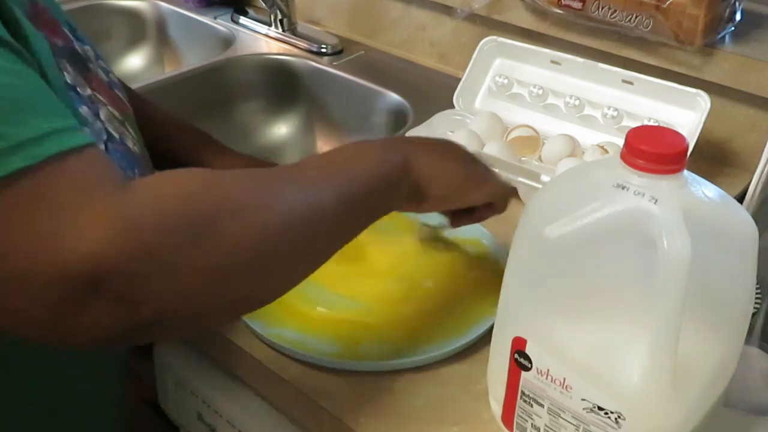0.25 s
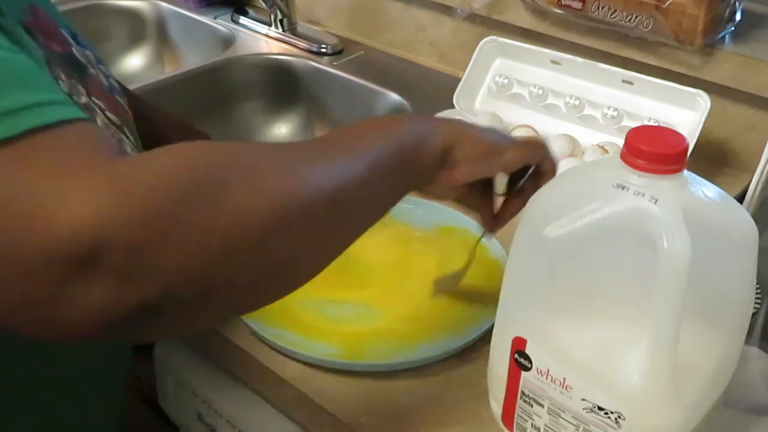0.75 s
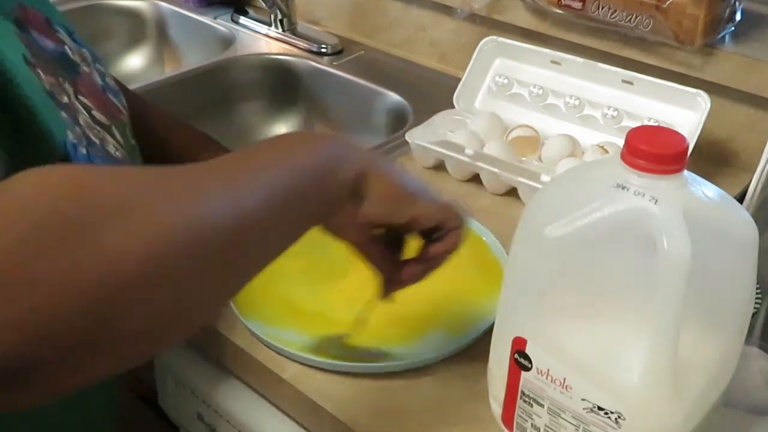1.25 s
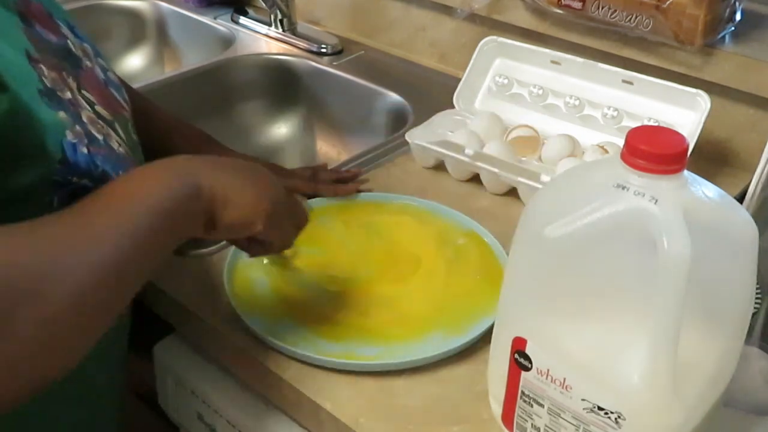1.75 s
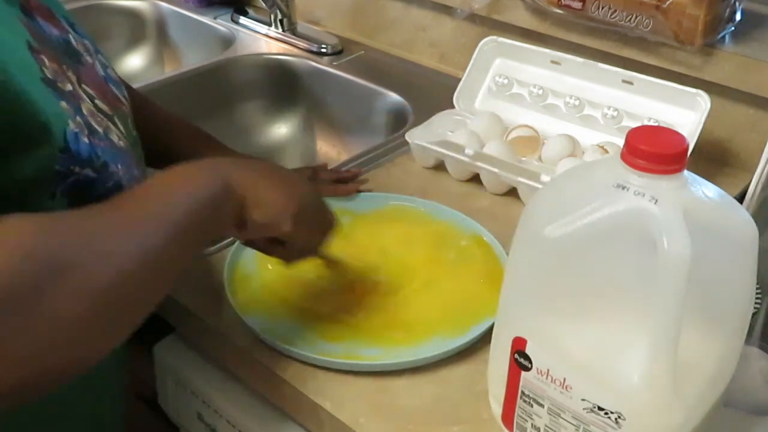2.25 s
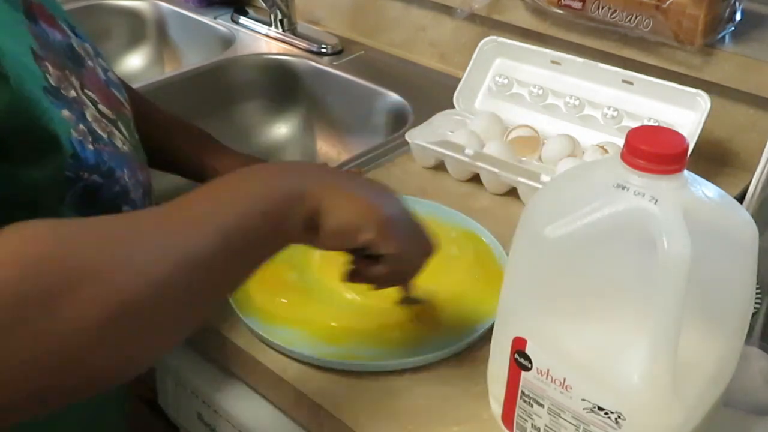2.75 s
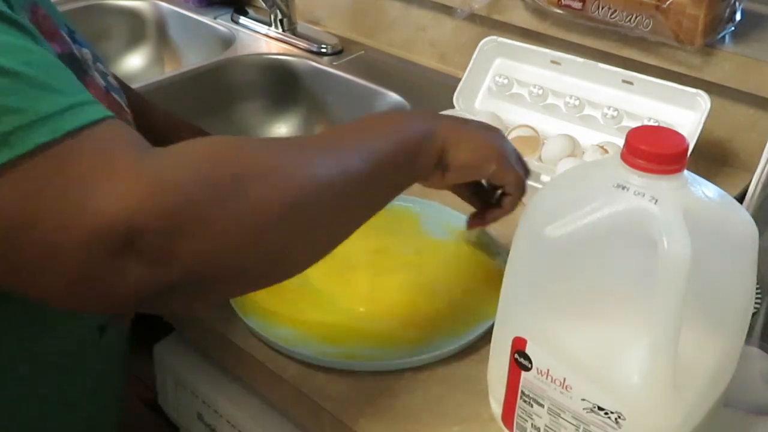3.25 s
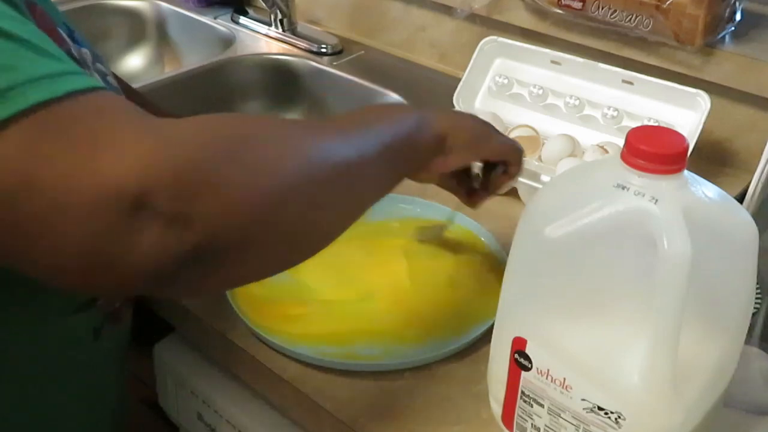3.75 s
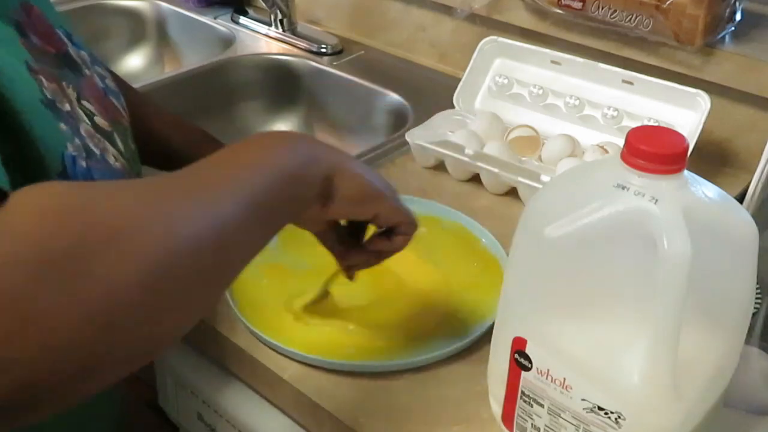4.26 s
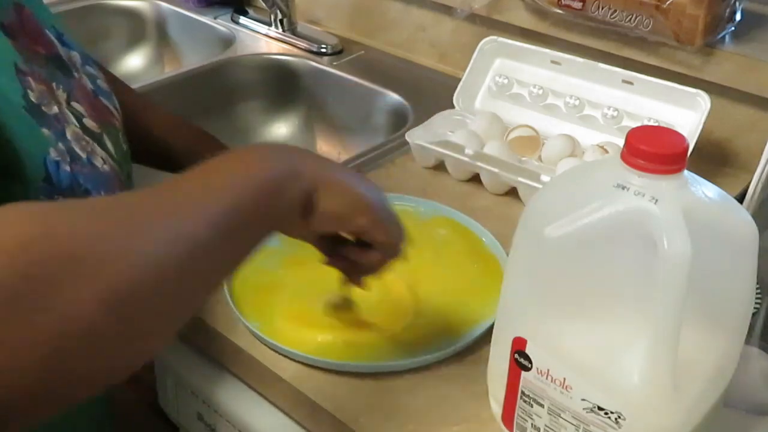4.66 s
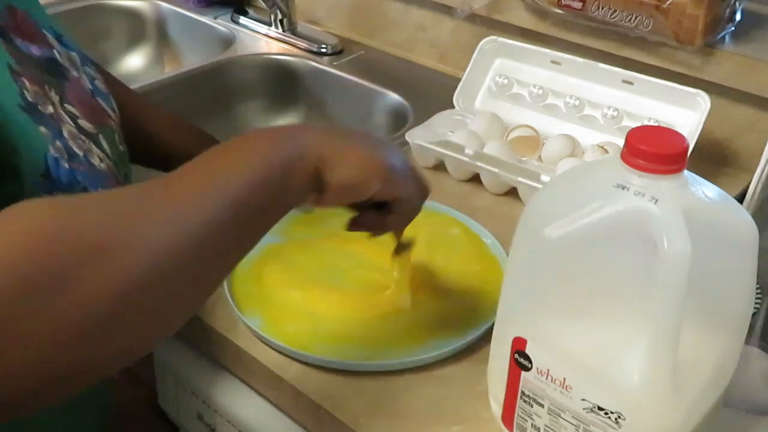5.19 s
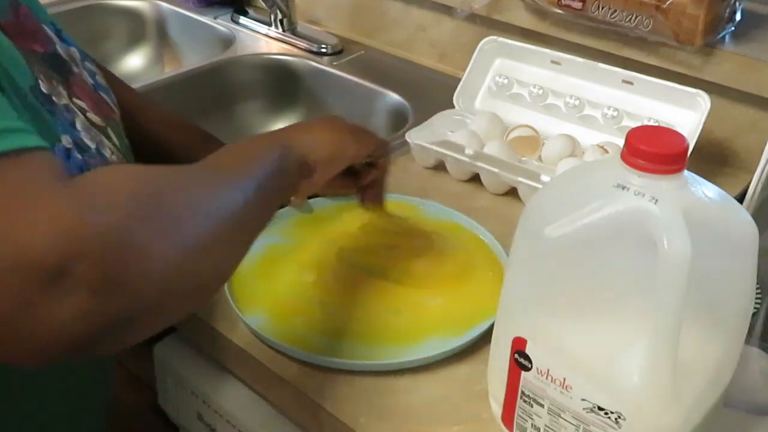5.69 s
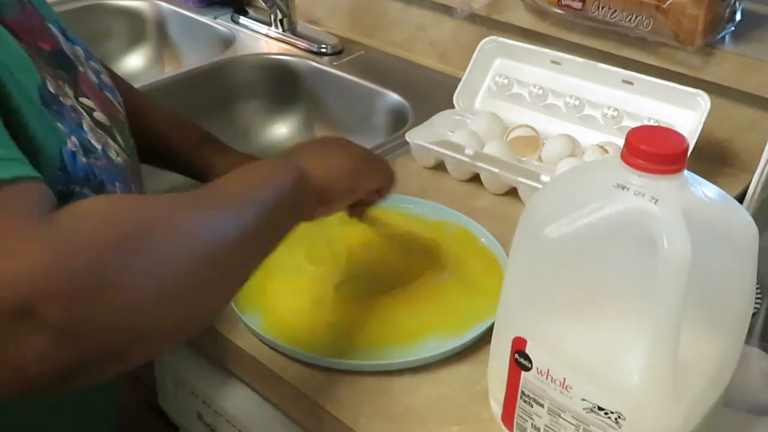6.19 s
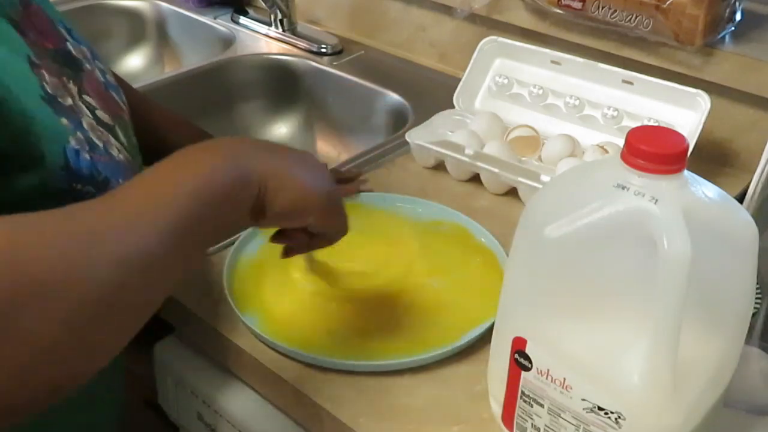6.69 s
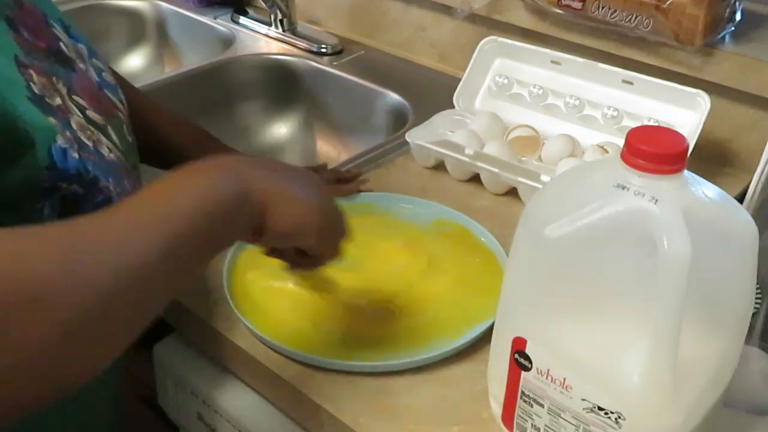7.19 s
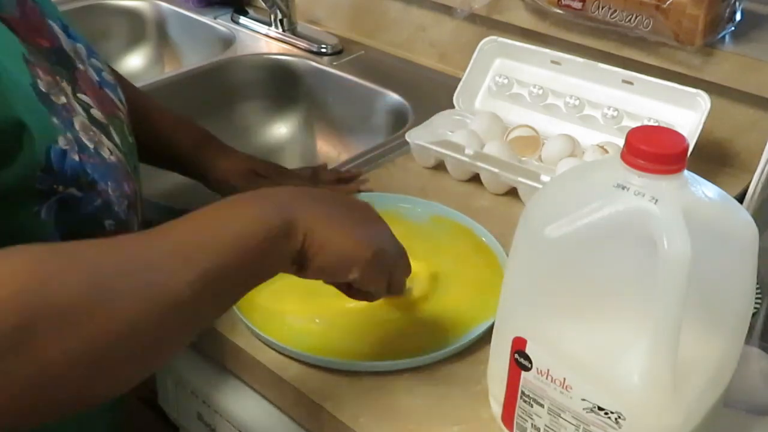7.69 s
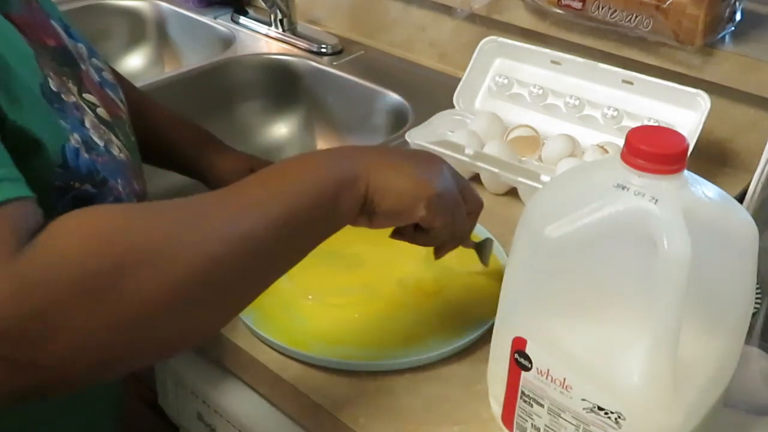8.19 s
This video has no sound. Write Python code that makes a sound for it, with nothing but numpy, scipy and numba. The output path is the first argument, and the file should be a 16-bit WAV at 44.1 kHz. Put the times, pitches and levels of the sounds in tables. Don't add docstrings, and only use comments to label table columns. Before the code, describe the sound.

Fast fork scrapes and sharp ceramic clacks as eggs are whisked on a plate in a small kitchen, with low room rumble underneath.

```python
import sys
import numpy as np
from scipy import signal
from scipy.fft import rfft, irfft, next_fast_len
from scipy.io import wavfile
from scipy.ndimage import uniform_filter1d
from numba import njit

SR = 44100
rng = np.random.default_rng(int(sys.argv[2]) if len(sys.argv) > 2 else 0)


def rack_gain(trim_db):
    fader = np.asarray(trim_db, float)
    return 10 ** (fader / 20)


def dump_mix(stems):
    frames = np.atleast_2d(stems).T
    limited = np.clip(frames, -1, 1)
    pcm = np.round(limited * 32767).astype(np.int16)
    wavfile.write(sys.argv[1], SR, pcm)


N = 372204


def noise():
    return rng.standard_normal(N)


def unit(x):
    return x / np.sqrt(np.mean(x ** 2))


def colour(x, points):
    hz, db = np.transpose(points)
    size = next_fast_len(len(x))
    bins_hz = np.arange(size // 2 + 1) * SR / size
    gain = rack_gain(np.interp(np.log(bins_hz + 1), np.log(hz), db))
    return irfft(rfft(x, size) * gain, size)[:len(x)]


def ring(x, hz, t60_s):
    r = np.exp(-np.log(1000) / (t60_s * SR))
    w = 2 * np.pi * hz / SR
    return signal.lfilter([1, 0, -1], [1, -2 * r * np.cos(w), r * r], x)


@njit
def sweep(x, hz, width_hz):
    y, band, low = np.empty(len(x)), 0., 0.
    for i in range(len(x)):
        g, k = np.tan(np.pi * hz[i] / SR), width_hz / hz[i]
        v = (band + g * (x[i] - low)) / (1 + g * (g + k))
        band, low, y[i] = 2 * v - band, low + 2 * g * v, k * v
    return y


def walk(rate_hz):
    hold = int(SR / rate_hz)
    steps = np.repeat(rng.standard_normal(N // hold + 1), hold)
    return 0.8 * uniform_filter1d(steps, hold)[:N]


# (frequency [Hz], width [Hz], level above body [dB])
SKID_RINGS = [(1177, 35, 8), (1400, 36, -22), (1490, 61, 7), (1720, 41, -9), (1893, 130, 9.5),
              (2268, 67, 10), (2326, 51, 1), (2441, 67, 9.5), (2668, 68, 6.5), (2690, 65, -20),
              (2800, 60, -1), (3230, 165, 9.5), (3500, 230, 5), (3730, 65, -15), (4286, 48, 12),
              (5430, 126, 11), (5900, 84, -16), (6040, 42, 4.5), (6610, 78, 9), (6590, 120, 7.5),
              (7640, 250, 7), (9290, 180, 10)]
# (frequency [Hz], density [dB per Hz])
SKID_BODY = [(700, -32), (1100, -13.5), (1700, -0.5), (2100, -10), (2300, -2.5), (2700, -5.5), (3050, -17),
             (3450, -7), (4150, -20), (5300, -9.5), (6600, -10), (8600, -20), (14500, -24.5), (16200, -25)]
# (frequency [Hz], density [dB per Hz])
FLAT_BODY = [(700, -12), (1000, -13), (1350, -3), (1800, -12), (2400, -13), (2700, -8.5), (3200, -5),
             (3700, -3), (4300, -7), (4800, -10), (5200, -3.5), (6600, -9.5), (8600, -15.5), (14500, -11),
             (16200, -38)]


def skid(slips_per_s=6000, scatter_db=2.0, spot_db=8.0, spot_hz=26, bend=0.022, rough_db=1.96,
         patchy_db=1.85, lean_share=0.043):
    sizes = rack_gain(scatter_db * rng.exponential(size=N)) * np.sign(noise())
    grit = unit((rng.random(N) < slips_per_s / SR) * sizes)
    plate = spots(grit)
    feed = rack_gain(spot_db * (np.minimum(walk(spot_hz), 0.9) - 1))
    pitch = 1 + bend * walk(9)
    for hz, width_hz, db in SKID_RINGS:
        slip, spot, load = (np.roll(x, rng.integers(N)) for x in (grit, feed, pitch))
        plate = plate + rack_gain(db) * sweep(slip * spot, hz * load, float(width_hz))
    plate = plate * rack_gain(rough_db * walk(60))
    lean = np.clip(.5 + .6 * walk(8), 0, 1)
    low, high = (colour(plate, np.array(SKID_BODY) * [1 + way * lean_share, 1]) for way in (-1, 1))
    upright = lean * high + (1 - lean) * low
    flat = laid_flat()
    zones = split(travel((1 - flat) * upright + flat * colour(plate, FLAT_BODY)))
    gains = stroke_gains() * rack_gain(patchy_db * np.array([walk(30) for _ in zones]))
    near = np.sum(gains * zones, axis=0)
    far = np.sum(gains * np.roll(zones, 3000, axis=1), axis=0)
    return near, far


def spots(grit, ripple_db=8.0, step_hz=170, rate_hz=18, swap_db=7.5, smooth_hz=14000, count=5):
    hz = np.arange(step_hz, SR / 2, step_hz)
    depth_db = ripple_db / (1 + (hz / smooth_hz) ** 2)
    combs = [np.transpose([hz, depth_db * rng.standard_normal(len(hz))]) for _ in range(count)]
    shares = rack_gain(swap_db * np.array([walk(rate_hz) for _ in combs]))
    shares /= np.sqrt(np.sum(shares ** 2, axis=0))
    plate = 0
    for share, comb in zip(shares, combs):
        plate = plate + share * unit(colour(np.roll(grit, rng.integers(N)), comb))
    return plate


# (time [s], share laid flat [0-1])
FLAT = [(0, 0.06), (1.2, 0.27), (1.5, 0), (3.1, 0), (3.3, 0.04), (3.8, 0.2), (4, 0.07), (5.3, 0.03),
        (5.55, 0.8), (6.2, 0.33), (6.35, 0.63), (6.8, 0.97), (7.1, 0.2), (7.5, 0.06), (7.9, 0.15),
        (8.44, 0.95)]


def laid_flat():
    return np.clip(np.interp(np.arange(N) / SR, *np.transpose(FLAT)), 0, 1)


# (upright [Hz], flat [Hz])
RIM_RING_HZ, CENTRE_RING_HZ, TRAVEL_FROM_S = (1830, 1390), (2480, 3180), 5.6


def travel(plate, rim_db=-3.0, centre_db=-14.0, rim_width_hz=710.0, centre_width_hz=290.0):
    flat = laid_flat()
    rim = rack_gain(rim_db) * sweep(plate, np.interp(flat, (0, 1), RIM_RING_HZ), rim_width_hz)
    centre = rack_gain(centre_db) * sweep(plate, np.interp(flat, (0, 1), CENTRE_RING_HZ), centre_width_hz)
    return plate + (np.arange(N) / SR > TRAVEL_FROM_S) * (rim + centre)


ZONE_HZ = (2100, 4300, 8300, 11500)


def split(x, order=8):
    size = next_fast_len(N)
    hz, spectrum = np.arange(size // 2 + 1) * SR / size, rfft(x, size)
    below = [irfft(spectrum / (1 + (hz / edge) ** order), size)[:N] for edge in ZONE_HZ]
    return [unit(zone) for zone in np.diff([0 * x] + below + [x], axis=0)]


# (start [s], pause at turn [dB], pressure [dB], speed
# [dB])
STROKES = [(0.0, 3, -42.5, -3.5), (.1, -5.5, -41, -4), (.359, -8, -42, 0.5), (.431, -3, -47, -4),
           (.716, -8.5, -43, -2.5), (.78, 3, -38.5, -5), (.873, 0.5, -40, 0), (1.219, 1, -29.5, -6),
           (1.257, 4, -37.5, 0.5), (1.355, 2, -40, 4), (1.434, 0.5, -37.5, 0), (3.323, -3, -34, -5),
           (3.351, 2, -36, -0.5), (3.454, -0.5, -41, 2), (3.557, -1, -43, 2), (3.843, -1, -38, -3.5),
           (3.921, 0.5, -40.5, -0.5), (5.576, -2.5, -43, -10), (5.62, 3, -43.5, -4.5),
           (5.706, -2, -44.5, -6.5), (5.792, 3, -44, -3), (5.86, 7, -43.5, -6.5), (5.92, -1, -44.5, -4),
           (5.972, -2, -39.5, -0.5), (6.238, -2.5, -33, -6), (6.295, 4.5, -39.5, -2.5),
           (8.386, -9, -41.5, -9),
           (1.511, 5.5, -42.5, 2), (1.643, 6.5, -42, -4.5), (1.73, 1.5, -35, -3.5),
               (1.864, 6.5, -34.5, -2), (1.949, 5, -33, -3), (2.093, 8, -31, -2.5), (2.187, 6.5, -34, -1.5),
               (2.326, 4, -33.5, -3.5), (2.414, 10.5, -34.5, 0), (2.545, 7, -36, -1),
               (2.656, 5.5, -34.5, -1.5), (2.751, 0.5, -38.5, -5.5), (2.846, -1, -41, -5.5),
               (3.035, 4.5, -41, 1.5),
           (4.014, 3.5, -34, -1.5), (4.208, 7, -40, -2.5), (4.291, 4.5, -38.5, 0),
                (4.412, 5.5, -43.5, 2), (4.501, 3.5, -38, -1.5), (4.583, -1, -40.5, -2.5),
                (4.754, 3.5, -36, 0.5), (4.939, 6, -32, -3.5), (5.023, 8.5, -38, -4.5), (5.136, 7, -34, -2),
           (6.38, -2, -34.5, -4), (6.551, 5.5, -36.5, -5), (6.699, 5.5, -36, -5),
               (6.828, 5.5, -39.5, -1.5), (6.936, 6, -40, 1), (7.057, 4, -42, 2.5), (7.164, 6.5, -39, 1.5),
               (7.22, 3.5, -43, 4.5), (7.276, 6.5, -40.5, 0), (7.397, 4.5, -44, 3.5), (7.501, 4, -40, 2.5),
               (7.605, 4, -38, -0.5), (7.714, 4, -37, 1), (7.849, -3, -35, -4), (7.908, 4, -39, -6),
               (7.968, 12.5, -42.5, -3)]
# (time [s], fading [dB per s])
RAISED = [
    (0.161, 908),
    (0.498, 313),
    (0.959, 302),
    (3.097, 345),
    (3.617, 512),
    (5.2, 348),
    (5.997, 354),
    (8.018, 497),
]
# (time [s], dip [dB], negative is louder)
LIFTS = [
    (.478, -5),
    (5.785, 0),
    (7.833, 12),
]
# (time [s], level [dB])
REACH = [(0, -5), (.12, -4), (.4, 1), (1.2, 1), (1.5, -7.5), (1.95, -8), (2.04, 4.5), (2.15, -11),
         (2.6, -4.5), (3.3, -7), (3.45, -4.5), (3.86, 8.5), (4.1, -3), (5.2, -2.5), (5.8, 2.5), (6.6, 1),
         (7.7, -4.5), (7.85, -6.5)]
TURN_SHARE = (0.12, 0.98, 1.56, 1.7, 1.7)
SWELL_DB = (.3, 0.8, 1.15, 1.74, 2.4)
# level; gain per dB of pressure, per dB of speed; change when flat
ZONE_DB, USUAL_DB = (-8, -0.5, -2.5, -7.5, -7.5), -35
PER_PRESSURE, PER_SPEED = (0.54, 0.86, 0.95, 0.88, 0.88), (0.058, 0.011, 1, 1.55, 1.6)
WHEN_FLAT_DB = (2, -3, 1, -7.5, -15)
TURN_S, CATCH_S, SLEW_S = 0.018, 0.012, 0.009
LONGEST_S, RAISED_DB = 0.18, 29


def stroke_gains():
    s, pause_db, pressure, speed = np.transpose(sorted(STROKES))
    at, now = (s * SR).astype(int), np.arange(N) / SR
    stroke = np.maximum(np.searchsorted(at, np.arange(N), "right") - 1, 0)
    start = s[stroke]
    db = np.outer(PER_PRESSURE, pressure - USUAL_DB) + np.outer(PER_SPEED, speed)
    db = db + USUAL_DB + np.c_[list(ZONE_DB)]
    db = db[:, stroke] + np.outer(WHEN_FLAT_DB, laid_flat())
    ends = np.minimum(np.append(s[1:], N / SR), s + LONGEST_S)[stroke]
    progress = np.clip((now - start) / (ends - start), 0, 1)
    db += np.outer(SWELL_DB, np.sin(np.pi * progress))
    db[0] += np.interp(now, *np.transpose(REACH))
    for up_s, fading in RAISED:
        db -= np.clip((now - up_s) * fading, 0, RAISED_DB) * (start < up_s)
    turns = np.zeros(N)
    turns[at] = pause_db
    for lift_s, lift_db in LIFTS:
        turns[int(lift_s * SR)] += lift_db
    t = np.arange(-SR // 20, SR // 20 + 1) / SR
    dip = np.exp(-.5 * (t / np.where(t < 0, TURN_S, CATCH_S)) ** 2)
    pause = signal.fftconvolve(turns, dip, "same")
    slew = int(SLEW_S * SR)
    gains = uniform_filter1d(rack_gain(db), slew, axis=1, origin=(slew - 1) // 2)
    return gains * rack_gain(-np.outer(TURN_SHARE, pause))


# (middle [s], length [s], frequency [Hz], level [dB])
SQUEAKS = [(0.493, 0.039, 2190, -40), (0.763, 0.13, 3380, -43), (1.402, 0.053, 1493, -40),
           (1.82, 0.041, 1930, -39), (1.994, 0.07, 2630, -38), (2.004, 0.041, 6400, -36),
           (2.158, 0.052, 2560, -40), (2.424, 0.187, 2530, -44), (2.469, 0.074, 5260, -38),
           (2.482, 0.042, 2470, -30), (2.575, 0.036, 2320, -44), (2.684, 0.048, 2300, -37),
           (2.847, 0.045, 2410, -42), (3.405, 0.042, 4440, -42), (3.418, 0.069, 2250, -43),
           (3.421, 0.078, 2800, -41), (3.611, 0.038, 5340, -37), (4.068, 0.081, 3550, -40),
           (4.084, 0.049, 2590, -34), (4.142, 0.052, 2230, -37), (4.246, 0.042, 2530, -35),
           (4.472, 0.045, 2570, -42), (4.802, 0.038, 2270, -44), (4.92, 0.056, 2565, -37),
           (4.975, 0.041, 3190, -38), (4.99, 0.036, 5380, -35), (5.058, 0.036, 2380, -38),
           (5.986, 0.039, 2350, -40), (6.427, 0.065, 5350, -40), (6.49, 0.044, 5060, -41),
           (6.584, 0.036, 3360, -37), (6.632, 0.044, 3160, -43.5), (6.659, 0.036, 5300, -37),
           (6.75, 0.093, 3820, -48), (6.778, 0.051, 5430, -40), (6.917, 0.056, 1590, -35),
           (7.066, 0.096, 1720, -43), (7.084, 0.036, 4300, -41), (7.089, 0.036, 3330, -39.5),
           (7.091, 0.038, 6120, -36), (7.178, 0.04, 2350, -39), (7.189, 0.036, 2680, -40),
           (7.311, 0.061, 2630, -37), (7.425, 0.036, 2370, -41), (7.537, 0.031, 2630, -41),
           (7.546, 0.042, 1414, -41), (7.586, 0.041, 3290, -37), (7.671, 0.05, 2630, -40)]
# (middle [s], length [s], frequency [Hz], level [dB])
GRINDS = [(.78, .05, 3530, -46), (1.285, .04, 2620, -39), (2.04, .04, 1500, -44), (3.345, .05, 1700, -35),
          (5.69, .06, 5700, -43), (5.67, .06, 11500, -55), (5.92, .07, 5040, -48), (6.31, .05, 1930, -38),
          (6.44, .05, 3200, -39), (6.485, .04, 3420, -30), (6.66, .04, 3500, -45), (6.76, .06, 3060, -43),
          (7.01, .05, 6000, -40), (7.865, .04, 2550, -37), (8.0, .04, 2500, -45)]


def catches(table, width_share, gain_db, glide=0.014, slips_per_s=2500, scatter_db=4.5):
    out = np.zeros(N + SR)
    for s, length_s, hz, db in table:
        length_s = min(length_s, .06)
        t = np.linspace(-1, 1, int(2 * length_s * SR))
        signs, sizes = rng.standard_normal((2, len(t)))
        slip = np.sign(signs) * rack_gain(scatter_db * np.abs(sizes)) * (rng.random(len(t)) < slips_per_s / SR)
        pitch_hz = hz * (1 + glide * rng.standard_normal() * t)
        narrow = sweep(slip, pitch_hz, width_share * hz)
        rung = unit(sweep(narrow, pitch_hz, 2 * width_share * hz))
        i = max(int((s - length_s) * SR), 0)
        out[i:i + len(t)] += rack_gain(db + gain_db) * rung * np.cos(np.pi * t / 2) ** 2
    return out[:N]


# (time [s], peak [dB], tick re peak [dB], best-rung [Hz],
# spread [octaves])
KNOCKS = [(.347, -8, -10.5, 2800, 0.23), (.349, -14, -25, 1820, 0.34), (.353, -20, -22, 3460, 0.11),
          (0.353, -15.5, -30, 1800, .4), (.357, -23.5, -30, 960, 0.22), (.488, -20, -28, 2090, 0.13),
          (0.703, -15, -3, 2200, 0.58), (.705, -11.5, -21, 1720, 0.18), (.709, -13, -28, 1220, 0.37),
          (.716, -12.5, -28, 1750, 0.26), (1.208, -16, -8.5, 2300, 0.44), (1.213, -19, -30, 1460, 0.16),
          (1.222, -22.5, -35, 857, 0.1), (1.231, -25, -25, 3170, 0.18), (3.311, -10, -8.5, 1700, 0.17),
          (3.313, -17, -25, 3500, 0.17), (3.321, -16, -25, 1560, 0.24), (3.328, -25, -30, 1560, .2),
          (3.831, -12, 0, 2940, 0.2), (3.832, -8, -33, 1980, 0.34), (3.833, -15.5, -30, 1250, .4),
          (3.844, -12, -27, 2170, 0.18), (5.405, -64, 14, 3000, .3), (5.564, -20.5, -6, 2640, 0.44),
          (5.567, -21, -20, 1240, 0.23), (5.578, -22, -35, 1480, 0.15), (5.793, -19.5, -17, 2300, 0.44),
          (5.806, -21.5, -40, 1600, 0.5), (6.227, -13.5, -6, 2290, 0.54), (6.230, -15.5, -28, 1400, .3),
          (6.237, -22, -30, 1900, .3), (6.242, -22, -30, 1360, 0.18), (7.535, -29.5, -25, 1450, 0.097),
          (7.849, -21.5, -18, 2450, 0.26), (7.989, -33, -14, 2500, 0.4), (8.19, -43, -17, 1440, 0.36),
          (8.375, -18.5, -8, 1520, 1.2), (8.383, -22.5, -26, 1050, 0.4)]
# (frequency [Hz], level [dB], t60 [s])
PLATE = [(830, -1, 0.16), (945, 2.5, 0.088), (1050, -6.5, 0.029), (1182, 3, 0.11), (1360, -3, 0.11),
         (1462, -2.5, 0.15), (1654, -6, 0.097), (1724, 1.5, 0.16), (1823, -1.5, 0.08), (1977, 0, 0.13),
         (2240, 3, 0.064), (2356, -1, 0.064), (2450, -8.5, 0.072), (2630, -2.5, 0.059), (2785, 1.5, 0.067),
         (3000, 3, 0.047), (3170, -16, 0.04), (3460, 7.5, 0.093), (3570, 3.5, 0.079), (4030, 1, 0.089),
         (4570, -7, 0.07), (5560, -12, .05), (6340, -20, .07), (7090, -20, .07), (7650, -21, .06)]
TICK_MS, CHATTER_MS = 3.5, 11.2


def knocks(tick_db=3.0, bass_hz=750, keep=0.27, clack_db=-9, clack_ms=14, soft=1.55):
    out, t = np.zeros(N + SR), np.arange(SR // 5) / SR
    bass_cut = signal.butter(2, bass_hz, "high", fs=SR, output="sos")
    for s, peak_db, tick_rel_db, hz, spread in KNOCKS:
        chatter_ms = CHATTER_MS * np.tanh(spread)
        taps = rng.standard_normal(len(t)) * (rng.random(len(t)) < .08) * np.exp(-1000 * t / chatter_ms)
        taps[0] += 1.5
        egg = signal.butter(2, min(soft * hz, 15000), fs=SR, output="sos")
        taps = signal.sosfilt(bass_cut, signal.sosfilt(egg, taps))
        tick = colour(rng.standard_normal(len(t)),
                      [(2500, -67.0), (5000, 13.5), (10000, 6.5), (13000, 1), (16500, 0)])
        tick = tick * np.exp(-1000 * t / TICK_MS)
        clack = sweep(rng.standard_normal(len(t)), hz + 0 * t, 2.3 * spread * hz)
        clack = sweep(clack, hz + 0 * t, 1.8 * hz) * np.exp(-1000 * t / clack_ms)
        knock = struck(PLATE, taps, hz, spread, 2.15, keep)
        knock = knock + rack_gain(tick_rel_db + tick_db) * tick / np.abs(tick).max()
        knock = knock + rack_gain(clack_db) * clack / np.abs(clack).max()
        i = int((s - .0005) * SR)
        out[i:i + len(t)] += rack_gain(peak_db) * knock
    return out[:N]


# (time [s], peak [dB], best-rung [Hz], spread [octaves])
THUDS = [(0.352, -22.5, 252, 2), (.707, -19, 251, 0.85), (1.225, -21.5, 296, 0.54), (3.312, -22, 382, 0.29),
         (3.316, -27, 150, .3), (3.831, -19.5, 600, 0.56), (3.836, -19.5, 222, 0.72),
         (5.567, -25, 460, 0.2), (5.572, -30.5, 170, .3), (5.645, -36, 140, .3), (5.797, -20.5, 128, 0.23),
         (6.233, -23.5, 140, 1.5), (6.646, -32, 410, 0.17), (7.7, -35, 900, 0.2), (8.377, -23.5, 412, 0.38)]
# (frequency [Hz], level [dB], t60 [s])
COUNTER = [(128, -2.5, 0.28), (168, 1.5, 0.2), (244, -8, 0.098), (299, -3.5, 0.19), (382.5, -1.5, 0.13),
           (490, -6, 0.038), (600, 4.5, 0.1), (794, -13, .07), (904, -6, 0.037)]


def thuds(rock_ms=4):
    out, t = np.zeros(N + SR), np.arange(SR // 5) / SR
    for s, peak_db, hz, spread in THUDS:
        rocking = uniform_filter1d(rng.standard_normal(len(t)), 24) * t * np.exp(-1000 * t / rock_ms)
        i = int((s - .002) * SR)
        out[i:i + len(t)] += rack_gain(peak_db) * struck(COUNTER, rocking, hz, spread, 0.6, 0.59, detune=.012)
    return out[:N]


def struck(modes, force, best_hz, reach_oct, spot_db, keep, detune=0.0031):
    x = 0
    for hz, db, t60_s in modes:
        spot, load = rng.standard_normal(2)
        mode = ring(force, hz * (1 + detune * load), keep * t60_s)
        off_db = 3.8 * (np.log2(hz / best_hz) / reach_oct) ** 2
        x = x + np.sign(load) * rack_gain(db + spot_db * spot - off_db) * mode / np.abs(mode).max()
    return x / np.abs(x).max()


# (frequency [Hz], level [dB])
ROOM = [(100, -3.5), (500, -1), (2500, -10), (6000, -11.5), (16000, -12.5)]
# (frequency [Hz], side re mid [dB])
ROOM_SIDE = [(60, -37), (110, -34), (200, -31), (380, -22), (700, -22), (1290, -26), (2380, -17),
             (4400, -13), (8120, -5), (15000, 0.5)]
ROOM_T60_S, SIDE_T60_S = 0.47, 0.16
PORTS_DB = -15


def echo(x, t60_s, points, wait_s):
    t = np.arange(SR // 2) / SR
    tail = rng.standard_normal(len(t)) * (t > wait_s) * np.exp(-np.log(1000) * t / t60_s)
    return colour(signal.fftconvolve(x, tail / np.sqrt(np.sum(tail ** 2)))[:N], points)


# (frequency [Hz], density [dB per Hz])
QUIET = [(12, -46), (20, -2), (38, -16), (65, -0.5), (123, -6.5), (150, -12.5), (234, -9.5), (262, -17.5),
         (293, -14), (328, -13.5), (513, -18), (1150, -25), (1330, -22), (1660, -25.5), (16000, -52.5)]
# (frequency [Hz], side re mid [dB])
QUIET_SIDE = [(60, -49), (110, -31), (200, -17), (380, -11), (700, -11.5), (1290, -11), (2380, -8),
              (4400, -5), (8120, -2), (15000, -4)]
# (frequency [Hz], width [Hz], level [dB])
HUM = [(73.4, 14.6, -45), (86, 46, -53.5), (118.66, 8.4, -47), (289.3, 23, -56.5), (364.8, 6.2, -57.5),
       (472, 2, -57.5)]
QUIET_DB = -39.5


def kitchen():
    mid, other = (rack_gain(QUIET_DB) * unit(colour(noise(), QUIET)) * rack_gain(walk(2.72)) for _ in range(2))
    hum = sum(rack_gain(db) * unit(ring(noise(), hz, 3.25 / width_hz)) for hz, width_hz, db in HUM)
    return rack_gain(-3.0) * mid + hum, colour(other, QUIET_SIDE)


def scene():
    near, far = skid()
    dry = near + catches(SQUEAKS, 0.032, -1.4) + catches(GRINDS, 0.12, 0.0) + knocks() + thuds()
    floor_mid, floor_side = kitchen()
    mid = dry + echo(dry, ROOM_T60_S, ROOM, wait_s=0.00129) + floor_mid
    side = echo(dry, SIDE_T60_S, ROOM_SIDE, wait_s=.0002) + rack_gain(PORTS_DB) * colour(far, ROOM_SIDE)
    side = side + floor_side
    return np.array([mid + side, mid - side])


def low_pass(x):
    return signal.sosfilt(signal.butter(12, 15760, fs=SR, output="sos"), x)


# (frequency [Hz], gain [dB])
MIC = [(20, 0.5), (13000, -1.5), (14500, 1), (15700, -8), (17500, -14)]


def record(dry):
    mix = np.array([colour(x, MIC) for x in dry])
    return low_pass(mix)


dry = scene()
out = record(dry)
dump_mix(out)
```